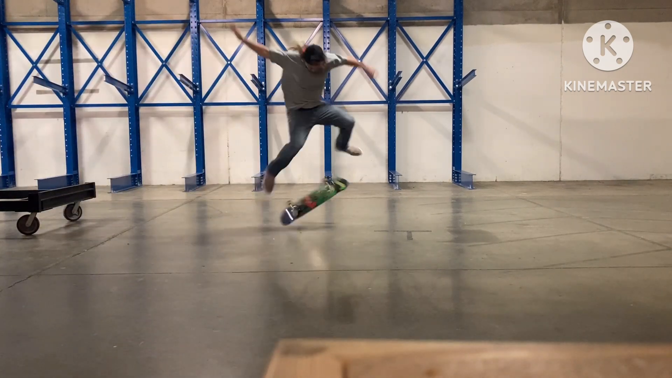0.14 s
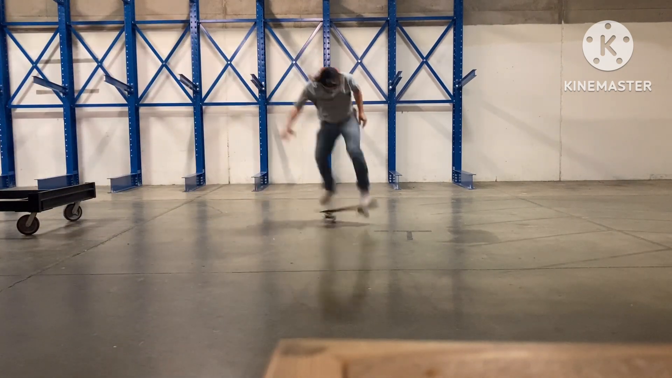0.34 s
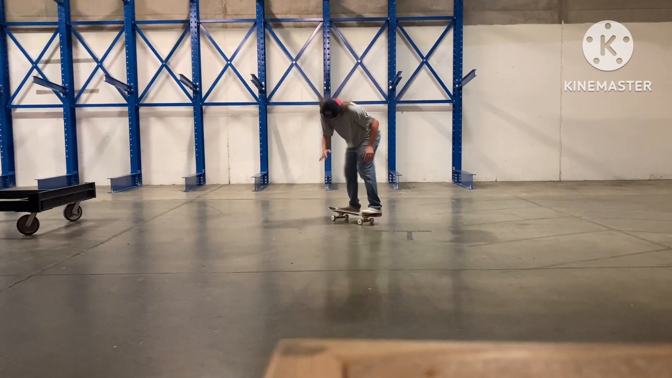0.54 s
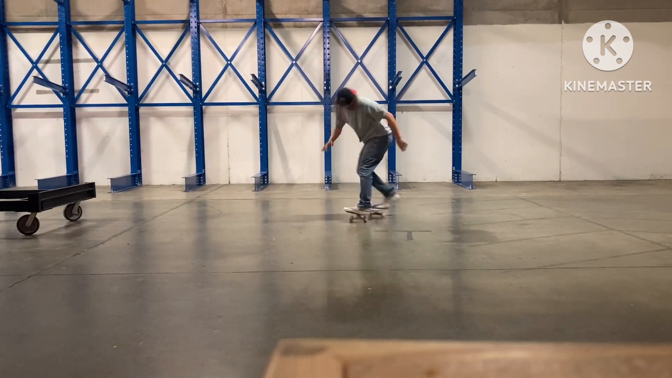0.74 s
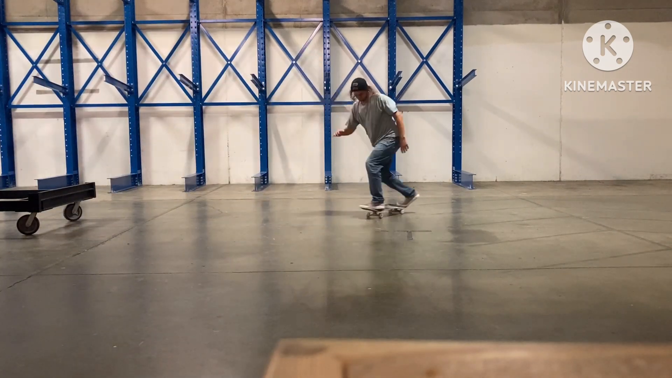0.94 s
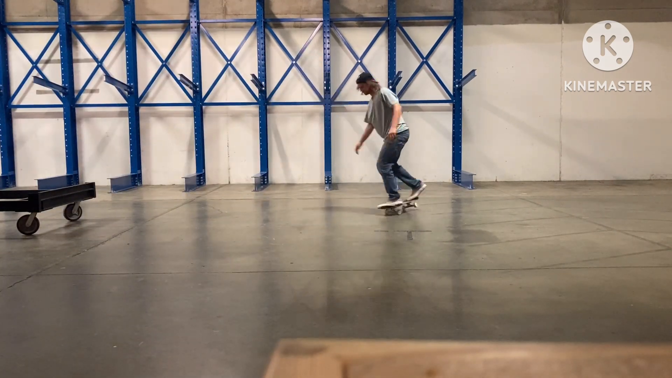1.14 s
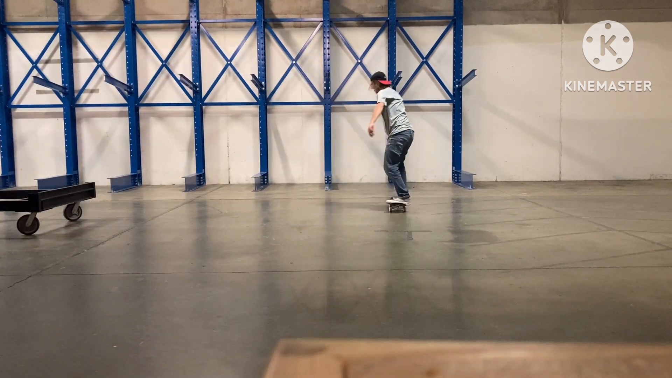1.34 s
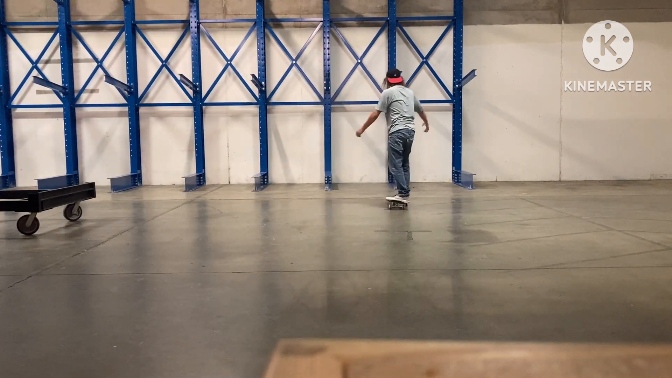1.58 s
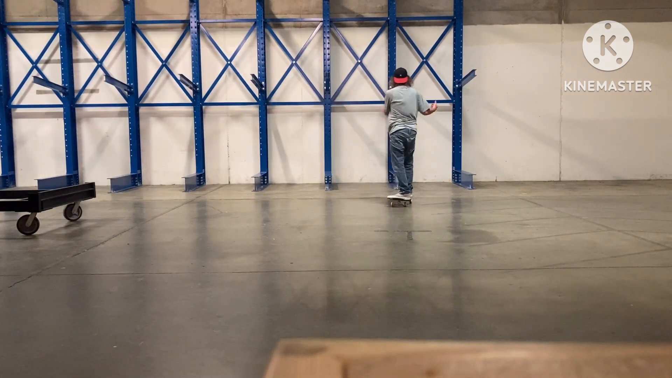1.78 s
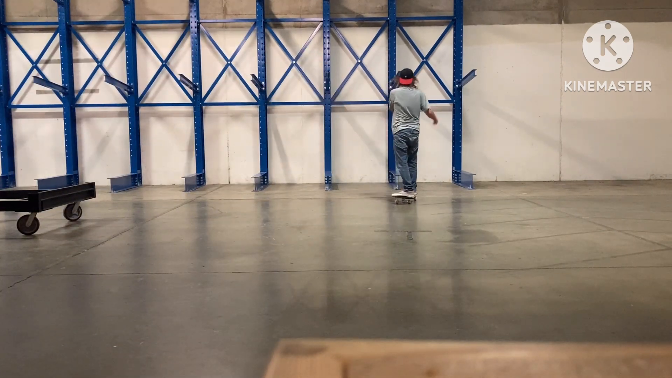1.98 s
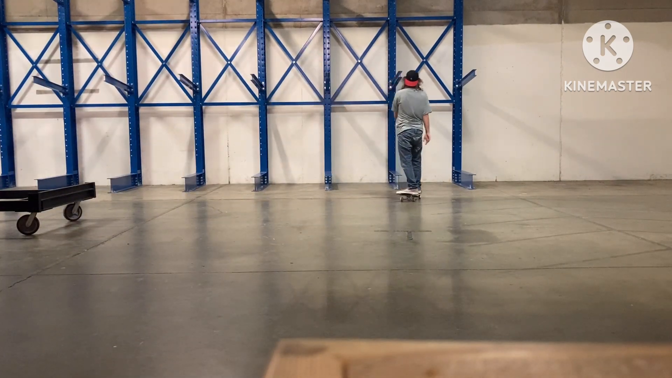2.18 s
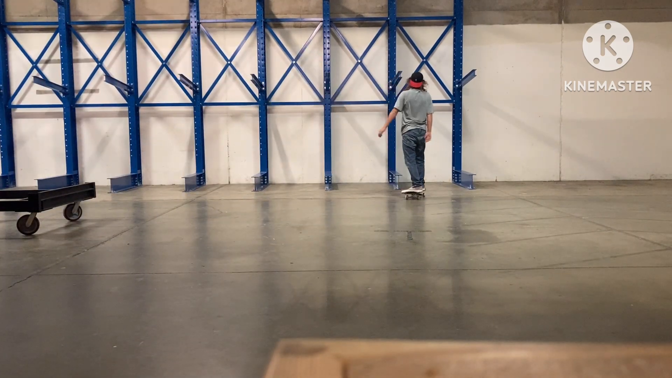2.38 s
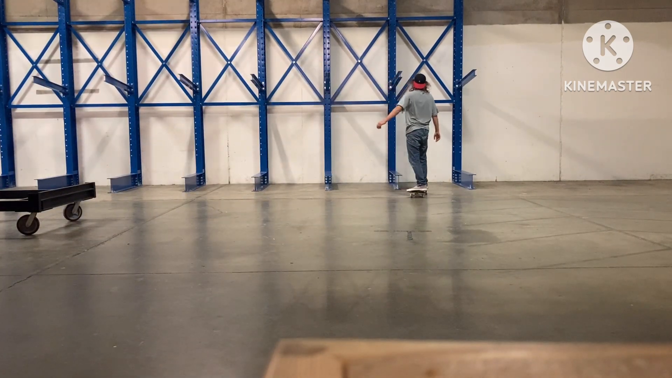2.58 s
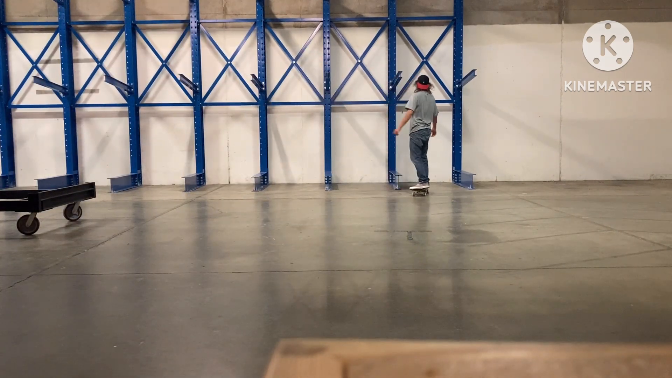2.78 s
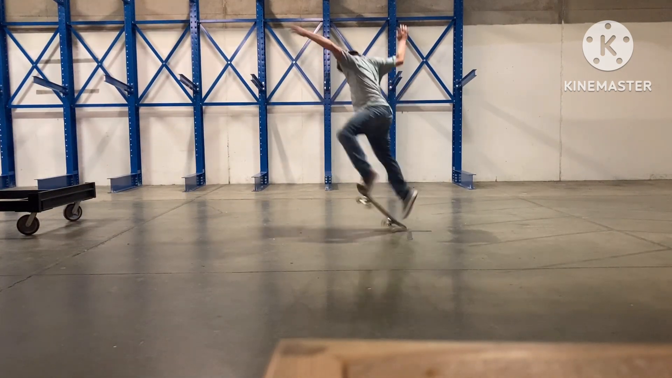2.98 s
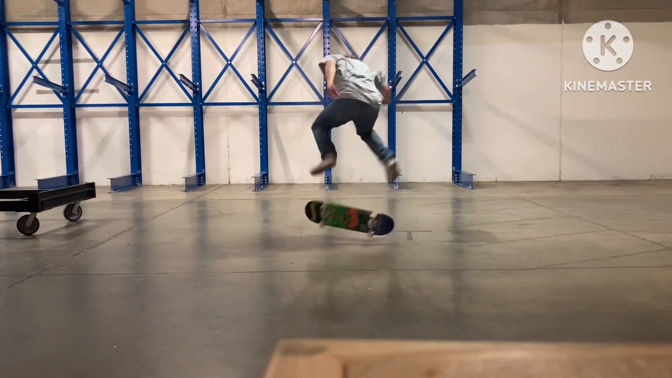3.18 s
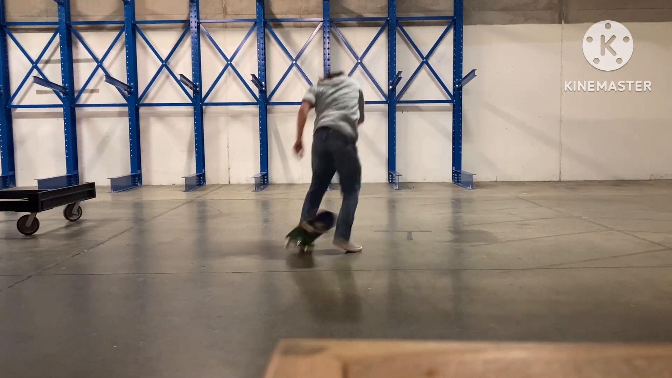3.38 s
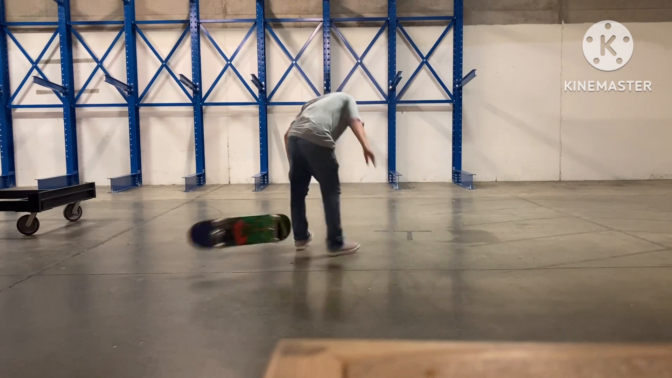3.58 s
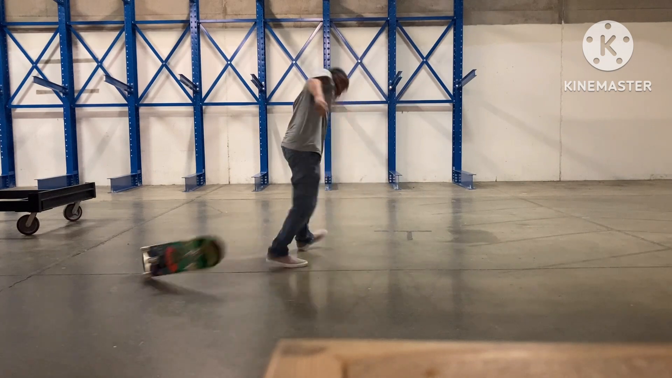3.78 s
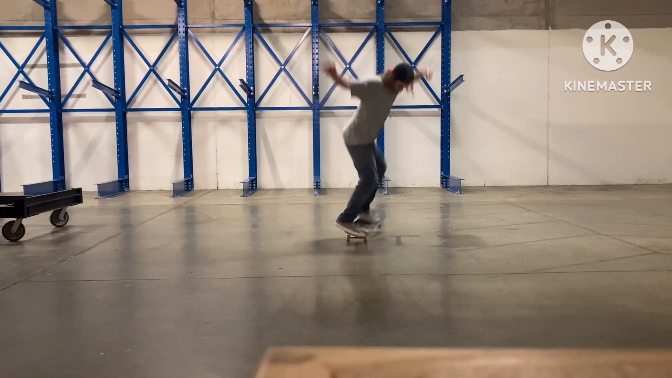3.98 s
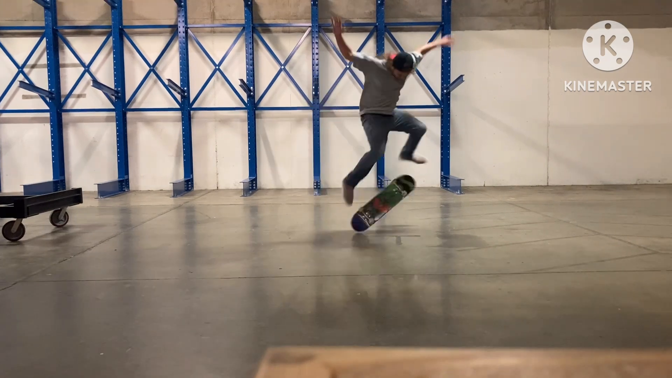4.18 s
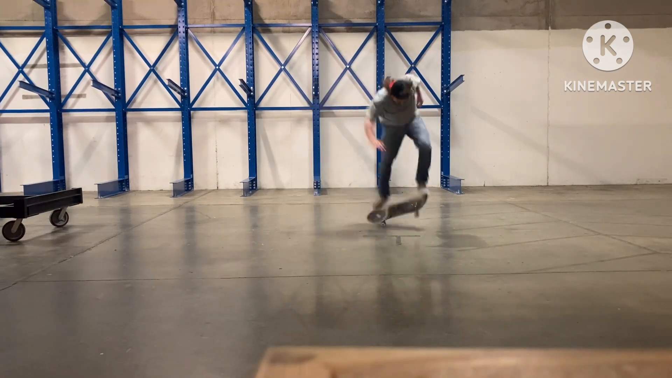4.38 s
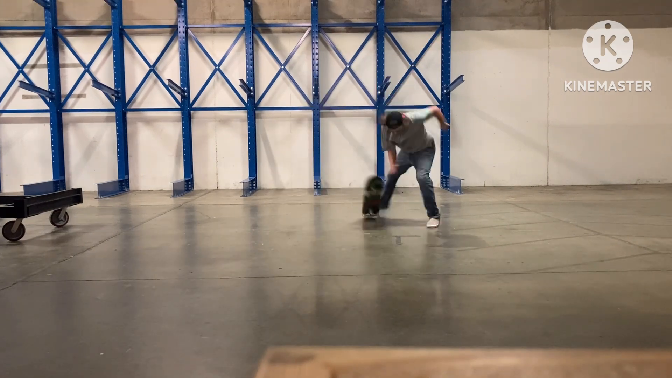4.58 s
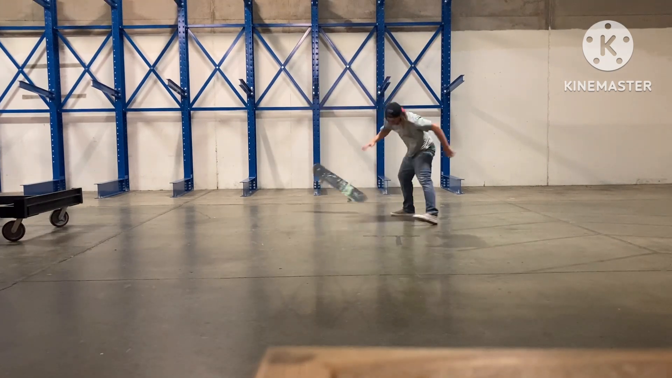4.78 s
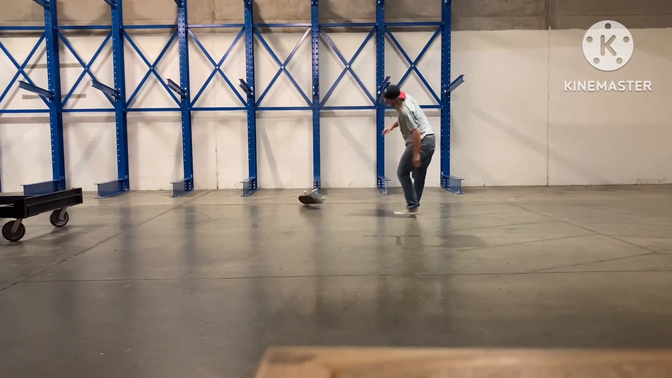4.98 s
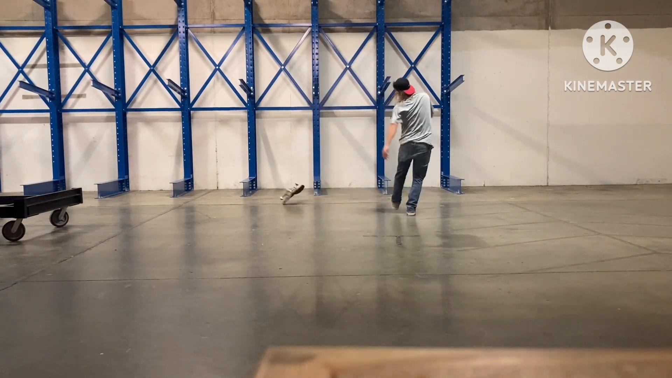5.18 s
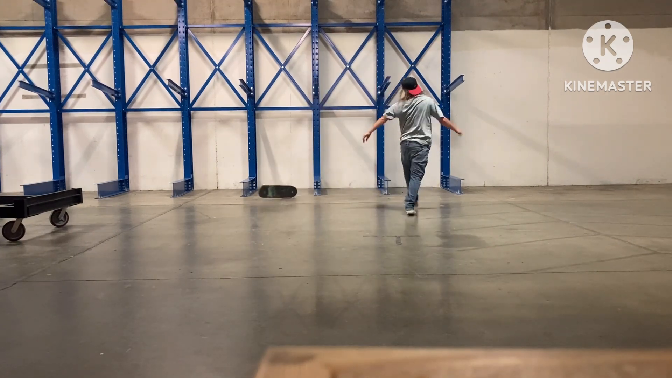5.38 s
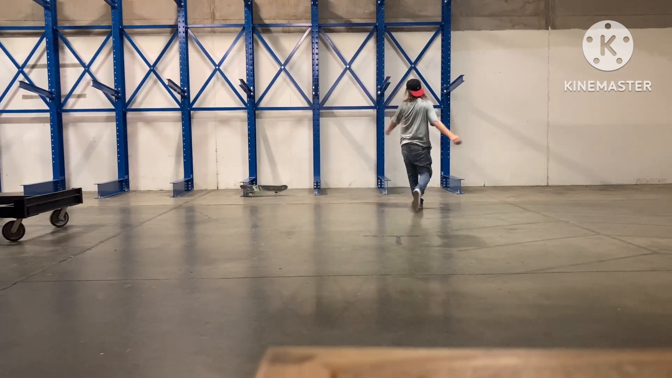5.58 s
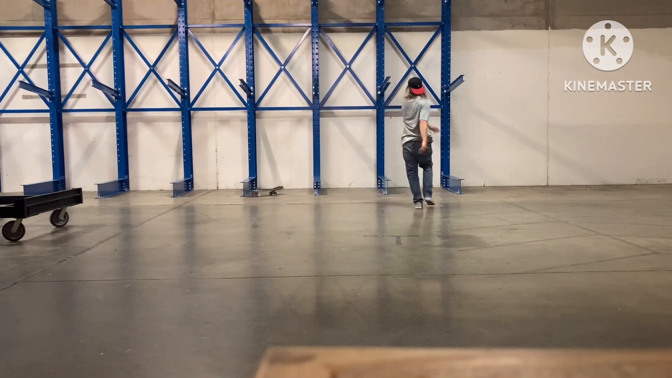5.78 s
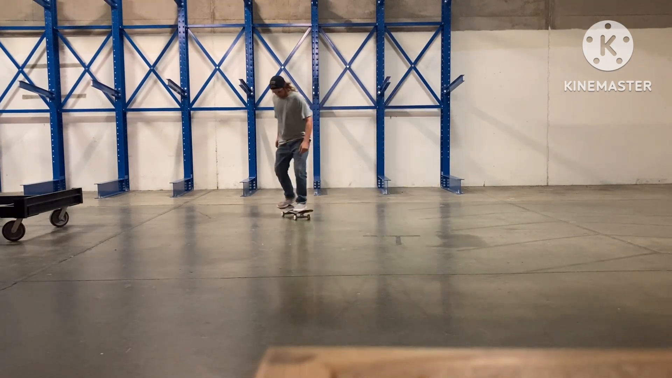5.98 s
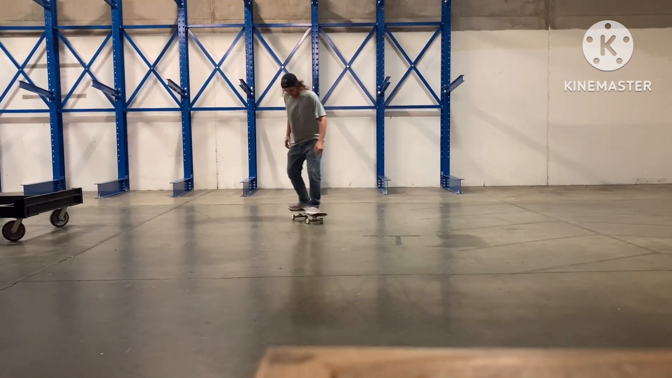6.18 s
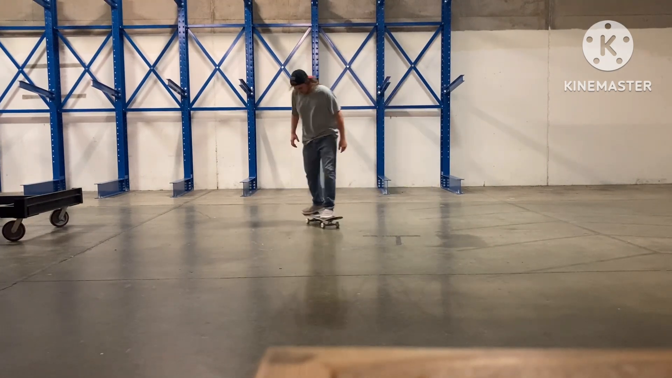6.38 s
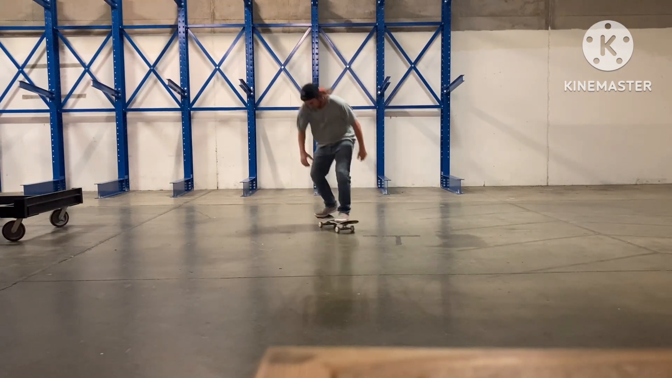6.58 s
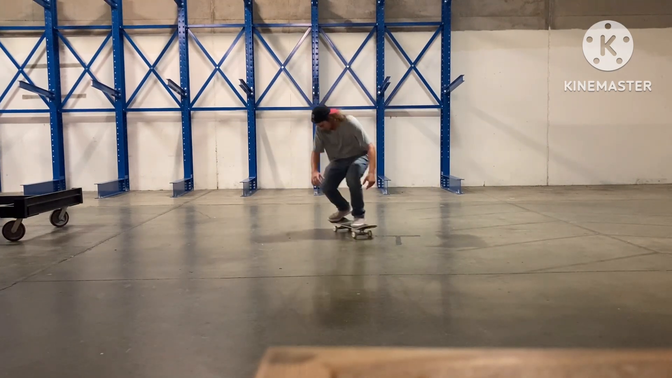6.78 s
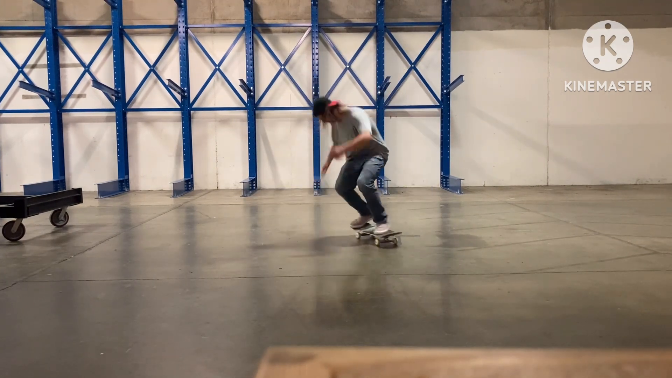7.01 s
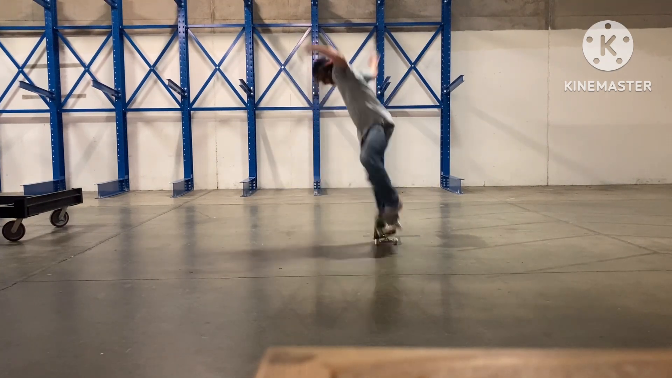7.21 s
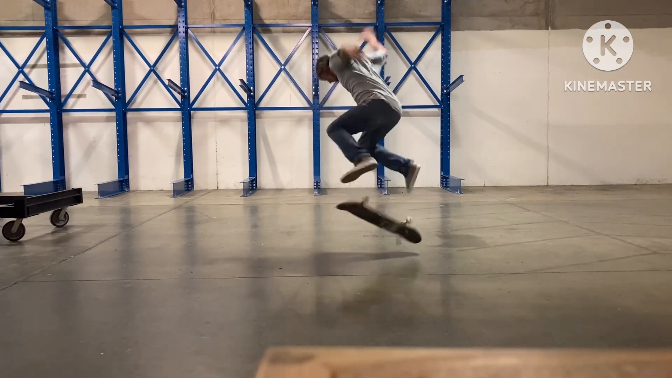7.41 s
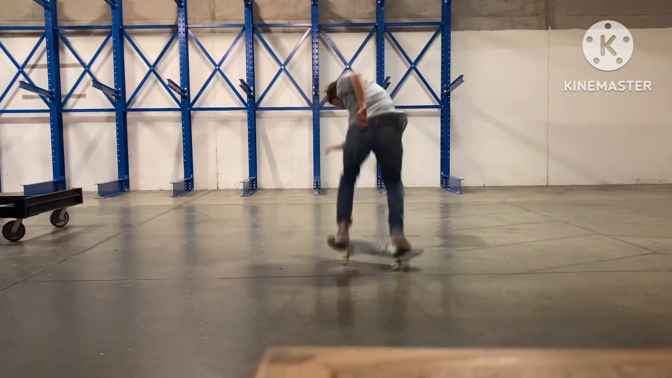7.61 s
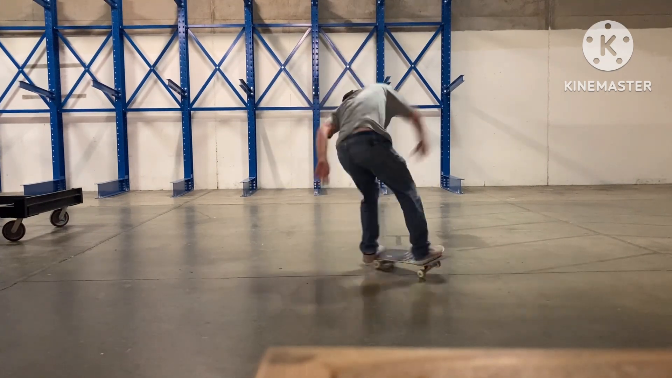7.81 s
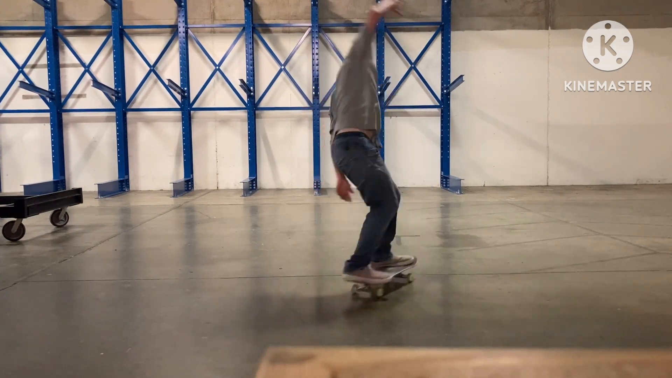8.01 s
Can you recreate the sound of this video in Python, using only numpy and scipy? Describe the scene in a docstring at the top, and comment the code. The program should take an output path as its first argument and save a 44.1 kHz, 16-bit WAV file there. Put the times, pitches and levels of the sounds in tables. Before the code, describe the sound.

A skateboard lands on smooth concrete with a sharp wooden clatter, then rolls on with a soft rumble and hiss. Two more tricks end with the loose board banging and bouncing across the floor. After a quiet roll, a crisp pop leads to one last hard landing. Each hit echoes through a large warehouse over a low fan hum, heard in stereo from a phone, with brief dips between attempts.

```python
"""Skateboard tricks in an empty warehouse

A skater tries flip tricks on polished concrete, in four shots joined by quick fades. Deck, wheels
and shoes clack on the floor, each blow makes the board ring, and the hall echoes. Wheels rumble and
hiss; two fans throb over a mains hum and the rush of ventilation. A phone listens through two
microphones and turns itself down on loud blows."""
import sys
import numpy as np
from scipy import signal
from scipy.fft import rfft, irfft, next_fast_len
from scipy.io import wavfile
from scipy.ndimage import uniform_filter1d

SR = 44100
rng = np.random.default_rng(int(sys.argv[2]) if len(sys.argv) > 2 else 0)


def unload_wav(signal):
    """Save mono or channel-first audio to the path in sys.argv[1] as 16-bit WAV at rate SR, clipped to [-1, 1]."""
    wavfile.write(
        sys.argv[1],
        SR,
        np.round(np.clip(np.atleast_2d(signal).T, -1, 1) * 32767).astype(np.int16),
    )


N = 355005
HZ = np.fft.rfftfreq(next_fast_len(N + SR), 1 / SR)

# The board's seven voices: thump, thud, boom, knock, clack (wood), then axle clink and crack.
# Each voice is a list of tones. Each row: pitch in Hz, width in Hz (wider dies sooner), level in dB.
BOARD_VOICES = [
    [(119.8, 83, -9.5), (111, 92, -1), (179.5, 29, -5.5)],
    [(245.6, 30, 0.5), (271, 19.4, -1), (353, 53, -3)],
    [(428, 55, 2), (513, 40, 3.5), (602, 54, 2.5), (690, 42.4, 6), (793, 303, 6)],
    [(1010, 120, -14), (1214, 95, 9.5), (1334, 110, 10.5), (1637, 258, 11)],
    [(1790, 130, 3.5), (2020, 190, 6), (2285, 190, 9), (2530, 230, 8)],
    [(2850, 1340, 13), (4244, 1190, 12), (4764, 530, 11.5), (5070, 2330, 10)],
    [(6180, 1370, 17.5), (9930, 1500, 17), (14700, 1900, 8)],
]
# Blows on the floor. Each row: start in seconds, then strength, body, hardness and clack over knock,
# all in dB, then contact time in milliseconds, share sent into the hall in dB.
BLOWS = [(0.0667, -20, -9.5, -10.5, -5, 3.5, 7.5), (0.1, -41.5, -4, 3, 4.5, 3.8, 12),
         (0.1173, -23, -7, -21, -7.5, 3.3, 5.5), (0.3884, -12, 2, -11, -13, 3.3, 1),
         (0.411, -9, 2, -5, 4, 5.8, 3), (0.4177, -18, -17, -6, -27, 4.9, 3.5),
         (0.437, -11.5, 6.5, -20, -16, 7.6, 1.5), (0.448, -16, 5.5, -3, -10, 1.5, 2.5),
         (0.7892, -21.5, 5, -7, -11, 5.7, 1), (0.838, -29.5, 4.5, -12.5, -20, 3, 2.5),
         (1.2896, -34, 1, -5.5, -21, 2.7, 4.5), (1.3207, -36.5, 12, -6.5, -20.5, 3.1, 8.5),
         (3.0355, -32.5, 3, -5.5, 2, 4.7, 3.5), (3.3302, -5.5, 2.5, -8.5, -5.5, 4.6, 2.5),
         (3.3371, -7, -2.5, -15, 11, 4.2, -3), (3.3664, -20, -8, -7.5, -5, 1.2, 12),
         (3.3784, -3.5, -1, -17, 0, 1.7, 0.5), (3.385, -16, 0.5, -4, 1, 3.6, 4),
         (3.4002, -8, 8, -12.5, -4, 8.6, -4.5), (3.4368, -18.5, -3, -7.5, 10, 2.8, 0),
         (3.464, -21.5, -8, -3, -20, 1.9, 2), (3.496, -10, -17, -12.5, -8, 2.4, -12),
         (3.732, -8, 1, -14.5, -3, 3.1, 4.5), (3.7509, -10, -24, -15.5, -11.5, 6.1, 6.5),
         (3.777, -16, 1.5, -10.5, -12, 3.8, 8), (4.1321, -21, -4, -2, 6, 2.3, -4.5),
         (4.1654, -21.5, -6, -10, -8.5, 3.4, 9), (4.2124, -21, -3.5, -21, -3, 4.1, 6),
         (4.458, -34, 6.5, -10, -7, 5.5, 5.5), (4.5063, -7, 5, -7, -3.5, 6.7, 7),
         (4.5236, -9.5, 4, -26, -7, 6.6, -6), (4.549, -11.5, -7, -11, -7, 2.2, 0),
         (4.5601, -12.5, -6, -25, -14.5, 1.9, 9.5), (4.647, -5, -18, -9.5, -1.5, 5, -3.5),
         (5.059, 2, -10, -21.5, -3.5, 3.6, 3), (5.0661, -7, -8, -12.5, 3, 1.8, 8.5),
         (5.1093, -15, -7, -5.5, 7, 3, 5.5), (5.1263, -3, -16, -10.5, -10.5, 3.5, 4),
         (5.1425, -14.5, -7, -2.5, 0, 2.2, -1), (5.3861, -6, -7.5, -33, 2, 0.9, -9),
         (5.3891, -4, -8.5, -19.5, -6.5, 0.73, 5.5), (5.504, -34, 0.5, -7, -7, 2.5, 10),
         (5.5584, -20, -9, -12, 3, 6.7, 3.5), (5.571, -25, 4, -6.5, -16.5, 5.4, 7.5),
         (5.683, -17.5, -2, -14, -8, 2.4, 15.5), (7.295, -3.5, -25, -13, 2, 0.35, -3.5),
         (7.2993, -9, -8, -21, -6.5, 1.4, 0), (7.414, -35.5, -3, -4, -8, 1.4, 4.5),
         (7.6469, -6, -2, -9, -4.5, 3.8, 5.5), (7.6582, -3, 4, -31, -4, 2.4, -1),
         (7.6685, -13, 10.5, -9, 2, 1.1, -8), (7.6902, -13, -1, -24, 0, 2.2, 2),
         (7.9548, -34.5, 14.5, 0, 12, 4.9, 6.5), (7.9779, -20.5, 5.5, -16, -5.5, 5.2, 9)]
# One number a voice: dB added to a blow's strength, then how much body, hardness and clack count.
BLOW_DB = [-15, -8, 0.5, -2, -1, 7, 0.47]
BODY_SHARE = [0.3, 0.95, 0.98, 0.25, 0.075, 0.066, 0.84]
HARD_SHARE = [0.35, 0.058, 0.0052, 0.096, 0.19, 1.236, 0.73]
CLACK_SHARE = [0, 0, 0, -.5, .5, 0, 0]
# Off its wheels, the board lands on bare wood and cracks less. Each row: start and end in seconds.
OFF_WHEELS = [(3.43, 3.8), (4.1, 4.3), (5.0, 5.5), (7.25, 7.35)]
WOOD_CRACK_DB, WOOD_TOP_HZ = -7, 2790
# The loose deck scuffs into a blow or shudders after it. Each row: start and length in seconds,
# then level, change along the way, extra bass and extra treble, all in dB.
SHUDDERS = [(0.094, 0.036, -38, -14, -16, -15), (0.374, 0.024, -38, 5, -13, -16),
            (0.392, 0.074, -22, -2.5, -0.5, -4), (0.451, 0.063, -19.5, -8.5, -9, -25),
            (0.786, 0.099, -25, -18.5, -15, -6), (1.286, 0.13, -34.5, -12, -2.5, -9),
            (3.315, 0.015, -45.5, 14, -15, -15), (3.347, 0.056, -19.5, 2, 3, -13.5),
            (3.4, 0.095, -24.5, -7, -14, -11), (3.72, 0.0073, -32, 15, -6, -3),
            (4.117, 0.037, -40, 11, -9, -11), (4.537, 0.08, -20.5, -23, 5, 1),
            (4.484, 0.039, -37, 10, -22, -12), (5.051, 0.0079, -31, 6, -22, -27),
            (5.117, 0.13, -28.5, -12.5, -11, -1), (5.376, 0.0089, -20, 3, -25, -22),
            (5.403, 0.17, -36, -7, 2.5, -7), (5.668, 0.194, -35.5, -1, 6.5, -2),
            (7.285, 0.0077, -40.5, 19, -15, -11), (7.636, 0.011, -27, 9, -10, -21),
            (7.647, 0.026, -17.5, -1.5, 1, -0.5), (7.672, 0.069, -15, -14.5, -27, -10),
            (7.942, 0.079, -24, -15, -2, -4.5)]
SHUDDER_DB = [-11, 0, 3.5, -4.5, -8.5, 1, 3.3]  # one number a voice: dB added to a shudder's level
# Single notes in the clatter. Each row: start and length in seconds, pitch in Hz, level in dB.
NOTES = [(.795, 0.097, 4600, -49), (0.807, 0.078, 4860, -45), (1.324, 0.029, 563, -37),
         (3.352, 0.023, 473, -37), (3.405, 0.049, 610.6, -17.5), (3.435, 0.031, 510, -22),
         (4.075, 0.016, 1616, -38.5), (4.555, 0.02, 530, -17), (4.58, 0.021, 602, -19.5),
         (5.114, 0.082, 674, -23.5), (5.11, 0.017, 1320, -17), (5.4, 0.02, 381, -17),
         (5.569, 0.027, 246, -24), (5.683, 0.049, 263.5, -26.5), (5.7, 0.054, 455, -26),
         (5.679, 0.06, 1806, -26.5), (5.68, 0.042, 1343, -27.5), (5.694, 0.059, 1456, -28),
         (5.694, 0.05, 573, -25.5), (5.708, 0.099, 318.3, -26.5), (5.722, 0.1, 1080, -31.5),
         (5.758, 0.1, 1627, -33.5), (5.759, 0.14, 604.3, -30.5), (6.124, 0.026, 3250, -57),
         (7.678, 0.0092, 517, -6.5), (7.701, 0.04, 515.5, -11.5), (7.988, .06, 389, -25)]
NOTE_WAVER, NOTE_FLUTTER_DB, NOTE_HALL_DB = 0.022, 3.5, -3.5  # the waver is a share of the pitch

# The wheels, one list a roll. Each row: time in seconds, rumble in dB, hiss in dB.
ROLLS = [
    [(0, -43, -53), (.07, -46, -44.5)],
    [(.8, -29.5, -32), (1.0, -47, -45), (1.29, -56, -55.5), (1.45, -55, -50), (1.86, -59.5, -77),
     (2.8, -68, -74.5)],
    [(2.84, -45.5, -63.5), (2.98, -40, -43), (3.04, -42.5, -43), (3.1, -58.5, -44), (3.3, -51, -62)],
    [(3.52, -56, -56), (3.6, -36, -48), (3.72, -27, -34)],
    [(3.88, -45, -57), (4.0, -39.5, -41.5), (4.05, -45, -40), (4.12, -41, -41)],
    [(5.89, -52, -62), (6.14, -51, -55), (6.73, -51, -57), (7.0, -48.5, -55), (7.15, -48, -47.5),
     (7.288, -42, -43.5)],
]
# Brief swells, as over floor joints. Each row: peak time in seconds, rumble in dB, hiss in dB.
SWELLS = [(2.029, -65, -74.5), (2.341, -49, -52.5), (2.641, -65.5, -66.5), (6.145, -74, -62)]
SWELL_RISE_S, SWELL_FALL_DB_PER_S = 0.035, 76
# The colours of the two rolling noises. Each row: frequency in Hz, level in dB.
RUMBLE_COLOUR = [(88, -50), (150, -6.5), (236, -1), (267, -7.5), (389, -4.5), (634, 2.5), (912, -13),
                 (1450, -3.5), (3000, -27), (3900, -64), (6600, -120)]
HISS_COLOUR = [(1500, 1), (2900, -3), (3400, 3), (4000, -3.5), (4700, 0.5), (5300, -6.5), (8000, -7.5),
               (11000, -7.5), (16000, -19)]
# Faint ticks near the phone. Each row: time in seconds, level in dB.
TICKS = [(5.9615, -48), (6.0338, -41)]
# What a tick rings with. Each row: pitch in Hz, width in Hz, level in dB.
TICK_TONES = [(12100, 2400, 9), (15200, 2500, 4), (5000, 3000, -21)]
CLICK_SCALE = np.sqrt(.004 * SR)  # gives a click the energy of 4 milliseconds at its level

# How long the hall rings. Each row: frequency in Hz, seconds to fade by 60 dB.
HALL_DECAY = [(120, 0.7), (330, 0.94), (870, 0.9), (2300, 0.96), (6000, 1), (12000, 0.5)]
# The colour of the echo. Each row: frequency in Hz, gain in dB.
HALL_COLOUR = [(120, -12.5), (500, -5), (2000, -4.5), (3500, 2), (6000, -4.5), (14000, -7.5)]
# Fan tones and hum tones. Each row: pitch in Hz, level in dB, left minus right in dB.
FANS = [(58.8, -40, -4), (52.95, -45.5, -3)]
HUM = [(119.2, -51.5, -12.5), (175, -63.5, -10.5), (243, -65, -8)]
# The colour of the ventilation. Each row: frequency in Hz, level in dB.
AIR_COLOUR = [(15, -20.5), (30, -16.5), (70, -9), (170, -20.5), (800, -28), (1600, -31), (2300, -52.5),
              (5000, -41), (7000, -51.5), (11000, -40), (15500, -62.5), (16500, -48)]
AIR_DB = -48.5

# How alike the microphones hear sound from all around. Each row: frequency in Hz, likeness (0 to 1).
MIC_LIKENESS = [(60, .97), (200, .92), (330, .7), (550, .1), (1300, .1), (3000, .15), (5700, .15),
                (6800, .78), (16000, .75)]
# Phase between left and right at each pitch, which widens the treble near 9 kHz.
# Each row: frequency in Hz, phase in radians.
STEREO_PHASE = [(0, 0), (1700, 0), (3000, 1.05), (5500, .8), (7200, 0), (8600, -2.8), (9400, -3.3),
                (11300, -6.3), (15800, -12.6), (17000, -12.6)]
# How much louder the left side is. Each row: frequency in Hz, left minus right in dB.
STEREO_TILT = [(60, -3), (150, -1), (380, 1), (1300, 1.8), (4000, 1), (7000, 0), (16000, 0)]
# The four shots. Each row: start, end and a moment when the fans throb loudest, all in seconds.
SHOTS = [(0, 2.83, 1.587), (2.83, 3.88, 3.056), (3.88, 5.88, 4.257), (5.88, 8.06, 5.95)]
# Fades between shots. Each row: fade start and stop in seconds, level reached in dB,
# level in the gap in dB, then when the sound returns and when it is full again, in seconds.
CUTS = [(2.68, 2.799, -6, -60, 2.86, 3.05), (3.74, 3.867, -22, -50, 3.893, 4.05),
        (5.86, 5.863, 0, -36, 5.901, 5.903)]
FADE_IN_POWER, TOP_HZ = 1.22, 16750


def gain_of(db):
    """Turns decibels into a number to multiply by."""
    return 10 ** (np.asarray(db) / 20)


def evened(x):
    """Scales a signal so that its average power is 1."""
    return x / np.sqrt(np.mean(x ** 2) + 1e-20)


def curve_at(points, hz):
    """Joins a table's points with lines, giving each octave about equal room."""
    f, value = np.transpose(points)
    return np.interp(np.log(hz + 1), np.log(f + 1), value)


def noise(colour, patchy_db):
    """Two unrelated noises of one colour, with drifting louder and softer patches."""
    frames, hz = N // 512 + 5, np.fft.rfftfreq(2048, 1 / SR)
    real, imag, patches = rng.standard_normal((3, 2, frames, len(hz))).swapaxes(2, 3)
    patches = evened(uniform_filter1d(uniform_filter1d(patches[0], 5, 1), 20, 0))
    spectrum = (real + 1j * imag) * gain_of(curve_at(colour, hz)[:, None] + patchy_db * patches)
    return evened(signal.istft(spectrum, nperseg=2048, noverlap=1536)[1][:, :N])


def struck(tones, damping):
    """One tap sets off tones that die away; more damping ends them sooner."""
    t, out = np.arange(4096) / SR, 0
    for k, (hz, width, db) in enumerate(tones):
        decay = np.exp(-np.pi * width * damping * t)
        out += (-1) ** k * gain_of(db) * np.sqrt(width) * decay * np.sin(2 * np.pi * hz * t)
    return out / np.linalg.norm(out)


def blows():
    """Each blow is a burst of tiny contacts. Returns pushes on the voices, for phone and hall."""
    t = np.arange(2048) / SR
    near, far = np.zeros((2, 7, N + 2048))
    for start, db, body_db, hard_db, clack_db, contact_ms, hall_db in BLOWS:
        colour_db = np.dot([body_db, hard_db, clack_db], [BODY_SHARE, HARD_SHARE, CLACK_SHARE])
        gains = gain_of(db + colour_db + BLOW_DB) * CLICK_SCALE
        if any(a < start < b for a, b in OFF_WHEELS):
            gains[-1] *= gain_of(WOOD_CRACK_DB)
        envelope = (1 - np.exp(-t / .001)) * np.exp(-1000 * t / max(contact_ms, .5))
        chatter = rng.standard_normal(2048) * envelope
        chatter[60] += 1.8 / max(contact_ms, .6) * np.linalg.norm(chatter)  # one hard contact
        at = round(start * SR)
        near[:, at:at + 2048] += np.outer(gains, chatter / np.linalg.norm(chatter))
        far[:, at + 100] += gains * gain_of(hall_db)
    return near, far


def shudders():
    """The loose deck rattles, pushing on the voices with uneven noise."""
    pushes = np.zeros((7, N + 2048))
    rattle = rng.standard_normal(N)
    rattle *= gain_of(2.84 * evened(uniform_filter1d(rng.standard_normal(N), 200)))
    for start, length, db, change_db, bass_db, treble_db in SHUDDERS:
        at, size = round(start * SR), round(length * SR)
        colour = gain_of(np.array(SHUDDER_DB) + [bass_db, bass_db, 0, 0, 0, treble_db, treble_db])
        level = gain_of(db + np.linspace(0, change_db, size)) * signal.windows.tukey(size, .3)
        pushes[:, at:at + size] += np.outer(colour, level * rattle[at:at + size])
    return pushes


def board(pushes, damping):
    """Pushes make the seven voices ring. The lowest five are wood, which gives off little treble."""
    wood = signal.butter(4, WOOD_TOP_HZ, fs=SR, output="sos")
    out = np.zeros(N)
    for k, (push, tones) in enumerate(zip(pushes, BOARD_VOICES)):
        ringing = struck(tones, damping)
        if k < 5:
            ringing = -signal.sosfilt(wood, ringing)
        out += signal.oaconvolve(push, ringing)[:N]
    return out


def flex_notes():
    """As the deck flexes, a wheel scuffs or a shoe squeaks, an unsteady note swells and dies."""
    out = np.zeros(N)
    for start, length, hz, db in NOTES:
        size = round(length * SR)
        swell = np.sin(np.pi * np.linspace(0, 1, size) ** 0.82)
        waver, flutter = evened(uniform_filter1d(rng.standard_normal((2, 8000)), 250))[:, :size]
        tone = np.sin(2 * np.pi * np.cumsum(hz * (1 + NOTE_WAVER * waver)) / SR)
        out[round(start * SR):][:size] += 2 * gain_of(db + NOTE_FLUTTER_DB * flutter) * swell * tone
    return out


def wheels():
    """The wheels rumble through the deck; bearings and grit hiss above them."""
    t, out = np.arange(N) / SR, 0
    rumble, hiss = noise(RUMBLE_COLOUR, patchy_db=3), noise(HISS_COLOUR, patchy_db=2)
    for column, sound in ((1, rumble), (2, hiss)):
        level = np.zeros(N)
        for roll in map(np.array, ROLLS):
            level += gain_of(np.interp(t, roll[:, 0], roll[:, column], -200, -200))
        for swell in SWELLS:
            age = t - swell[0]
            rise = np.clip(age / SWELL_RISE_S + 1, 0, 1)
            level += rise * gain_of(swell[column] - SWELL_FALL_DB_PER_S * np.maximum(age, 0))
        out += uniform_filter1d(level, 1500) * sound
    return out


def ticks():
    """Single clicks, high and short, with no echo."""
    clicks = np.zeros(N)
    for start, db in TICKS:
        clicks[round(start * SR)] = gain_of(db) * CLICK_SCALE
    return signal.oaconvolve(clicks, struck(TICK_TONES, damping=0.86))[:N]


def wall_echoes():
    """The hall's answer to a click: racks and the near wall first, then far walls in clumps."""
    taps = np.zeros((2, 60000))
    at = np.arange(240, 59960, 20) + rng.integers(0, 20, (2, 2986))
    np.put_along_axis(taps, at, rng.choice([-1., 1.], at.shape), 1)
    hz, t, bands = signal.stft(taps, SR, nperseg=256)
    early = np.clip(t / 0.011, .4, 1) + 1.06 * np.exp(-((t - .016) / 0.013) ** 2)
    clumps = uniform_filter1d(rng.standard_normal(bands.shape[1:]), 9, axis=0)
    clumps = evened(uniform_filter1d(clumps, 4, axis=1))
    shape = early * gain_of(-60 * t / curve_at(HALL_DECAY, hz)[:, None] + 1.74 * clumps)
    bands *= shape / np.linalg.norm(shape, axis=1, keepdims=True)
    strength = np.linalg.norm(signal.istft(bands, SR, nperseg=256)[1][0])
    colour = gain_of(curve_at(HALL_COLOUR, hz))[:, None]
    return signal.istft(bands * colour, SR, nperseg=256)[1] / strength


def hall(sound):
    """Each shot is at another spot on the floor, with its own echoes, which stop at the cut."""
    out = np.zeros((2, N))
    for start, end, _ in SHOTS:
        a, b = round(start * SR), min(round(end * SR), N)
        out[:, a:b] = signal.fftconvolve(sound[None, a:b], wall_echoes(), axes=1)[:, :b - a]
    return out


def fans_and_hum():
    """Two fans at slightly different speeds throb together; lamps and motors hum above them."""
    t, out = np.arange(N) / SR, np.zeros((2, N))
    since_throb = t.copy()
    for start, _, throb in SHOTS:
        since_throb[t >= start] = t[t >= start] - throb
    for hz, db, pan_db in FANS + HUM:
        waver = evened(sum(np.sin(2 * np.pi * (f * t + rng.random())) for f in np.geomspace(.5, 5, 8)))
        level = gain_of(db + 0.33 * waver + np.array([[.5], [-.5]]) * pan_db)
        out += level * np.sqrt(2) * np.cos(2 * np.pi * hz * since_throb)
    return out


def ventilation():
    """Moving air makes a soft, low rush."""
    return gain_of(AIR_DB) * noise(AIR_COLOUR, patchy_db=-2.0)


def stereo(shared, own, likeness):
    """The left gets the shared sound; the right gets it turned in phase and blended with its own."""
    size = 2 * len(HZ) - 2
    shared, own = rfft(shared, size), rfft(own, size)
    turn = np.exp(-1j * np.interp(HZ, *np.transpose(STEREO_PHASE)))
    tilt = gain_of(curve_at(STEREO_TILT, HZ) / 2)
    right = likeness * shared * turn + np.sqrt(1 - likeness ** 2) * own
    return irfft(np.array([shared * tilt, right / tilt]), size)[:, :N]


def auto_volume(sound, limit_db=-21.5, recovery_db_per_s=41.0, share=0.36):
    """The phone's gain drops fast by a share of the dB over the limit, then creeps back."""
    power_db = 10 * np.log10(abs(uniform_filter1d((sound ** 2).mean(0), 300)) + 1e-12)
    fall = np.arange(N) / SR * recovery_db_per_s  # how fast a remembered peak fades
    peak_db = np.maximum.accumulate(power_db + fall) - fall
    over_db = np.maximum(peak_db - limit_db, 0)
    return gain_of(-share * uniform_filter1d(over_db, 150, origin=74))


def fader():
    """The level dips at each cut, stays low for a moment and rises into the next shot."""
    t, gain = np.arange(N) / SR, np.ones(N)
    for fade, stop, db, gap_db, back, full in CUTS:
        closing = gain_of(np.interp(t, [fade, stop], [0, db]))
        opening = np.clip((t - back) / (full - back), 0, 1) ** FADE_IN_POWER
        gain *= np.where(t < stop, closing, np.maximum(opening, gain_of(gap_db)))
    return uniform_filter1d(gain, 150)


def scene():
    """The board close by, with echoes, rolling and machines all around."""
    near_blows, far_blows = blows()
    rattle, notes = shudders(), flex_notes()
    near = board(near_blows + rattle, damping=1) + notes + ticks()
    # The hall hears the board from every side, which blurs its tones.
    far = board(far_blows + gain_of(1.0) * rattle, damping=1.9) + gain_of(NOTE_HALL_DB) * notes
    around = hall(far) + wheels() + ventilation()
    direct = stereo(near, near, likeness=1.0)
    return direct + stereo(*around, curve_at(MIC_LIKENESS, HZ)) + fans_and_hum()


def record(dry):
    """Trims deep bass, turns down loud blows, fades at the cuts and drops the highest treble."""
    bass_cut = signal.butter(2, 36, "high", fs=SR, output="sos")
    ducked = signal.sosfilt(bass_cut, dry) * auto_volume(dry)
    rounded = ducked / (1 + ducked ** 4) ** .25  # gently flattens the tallest peaks
    treble_cut = signal.firwin(511, TOP_HZ, window=("kaiser", 9), fs=SR)
    return signal.oaconvolve(rounded * fader(), treble_cut[None], "same")


dry = scene()
out = record(dry)
unload_wav(out)
```